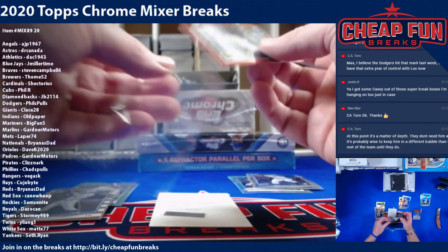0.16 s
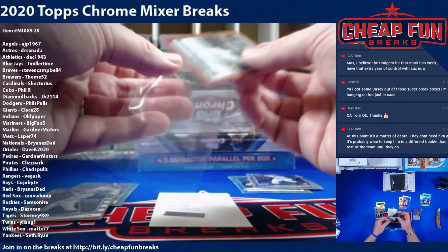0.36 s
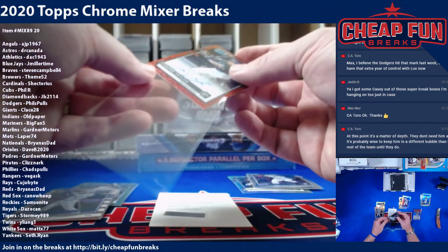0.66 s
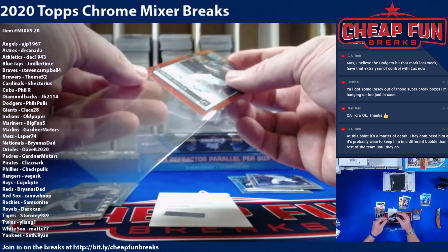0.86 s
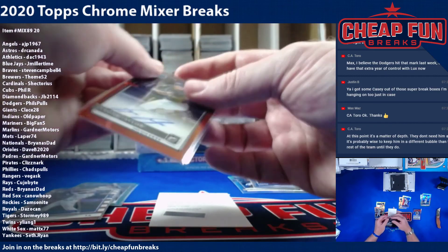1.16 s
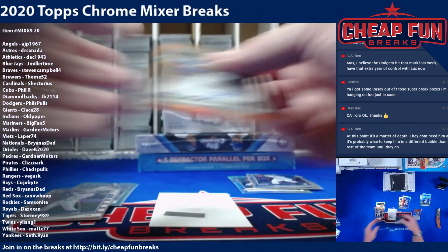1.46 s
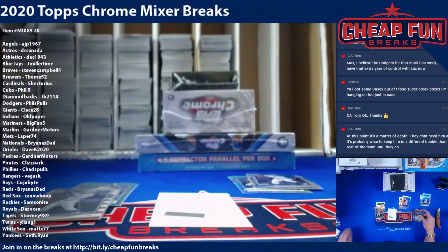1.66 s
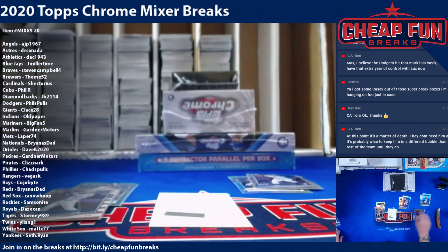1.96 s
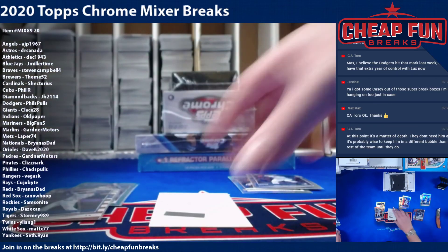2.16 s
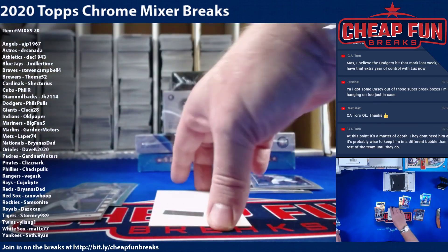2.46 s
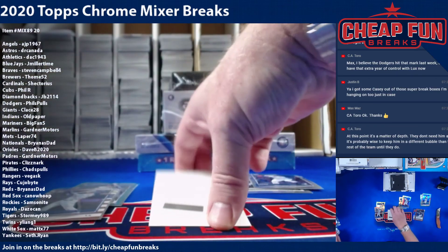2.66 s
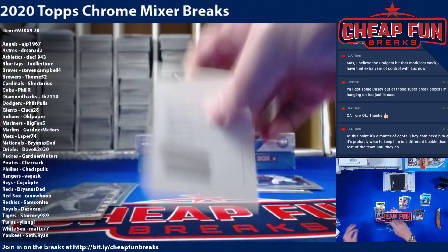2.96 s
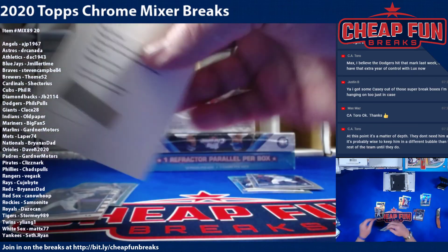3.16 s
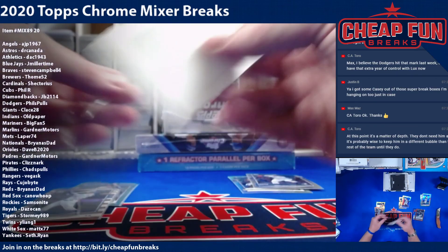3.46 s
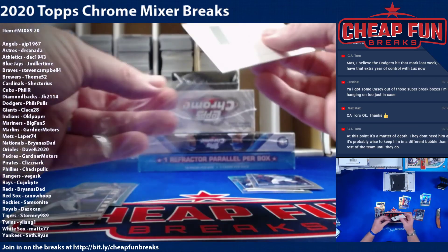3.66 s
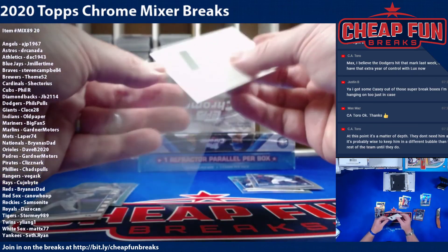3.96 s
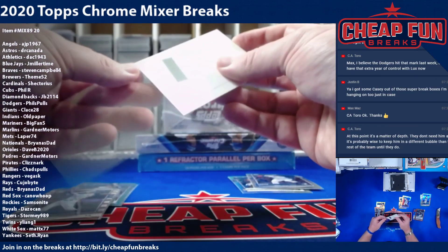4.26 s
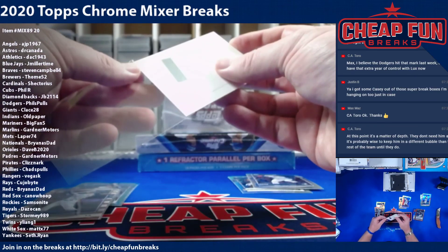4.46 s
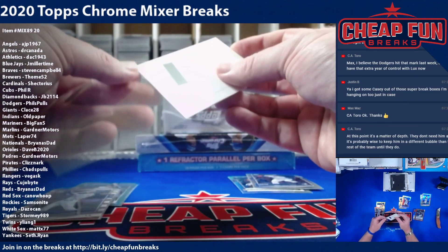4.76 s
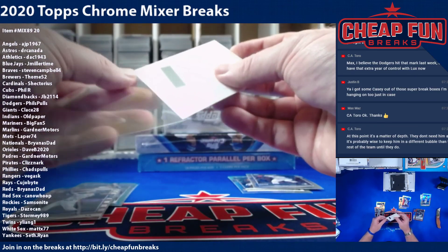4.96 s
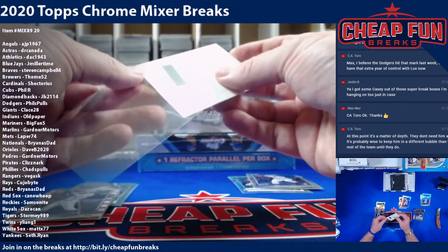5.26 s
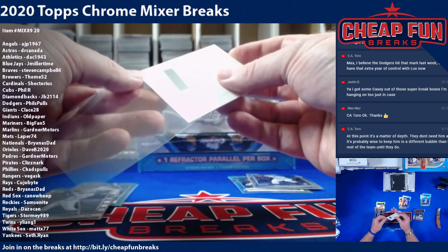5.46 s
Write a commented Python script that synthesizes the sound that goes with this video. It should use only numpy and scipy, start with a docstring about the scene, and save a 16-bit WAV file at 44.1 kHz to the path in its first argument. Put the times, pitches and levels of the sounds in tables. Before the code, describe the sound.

A card slides into a stiff plastic sleeve with faint rustles, sharp little clicks and soft table bumps over a low fan hum.

```python
"""A trading card slides into a stiff clear plastic sleeve and is laid on a padded table; a second card is
picked up and nudged against another sleeve, whose lip snaps once. Sliding is a hiss of tiny slips; edges
catch and crack; both ring the sleeve's flexing modes. Fingers and cards tap, a hand bumps the table.
All is close to the microphone, in a small room where fan motors hum."""
import sys
import numpy as np
from scipy import signal
from scipy.fft import rfft, irfft
from scipy.io import wavfile

SR = 44100
rng = np.random.default_rng(int(sys.argv[2]) if len(sys.argv) > 2 else 0)


def wav_out(sig):
    """Save sig, one row per channel (or a flat mono array), as 16-bit PCM at SR to the path in sys.argv[1]."""
    wavfile.write(sys.argv[1], SR, np.round(np.clip(np.atleast_2d(sig).T, -1, 1) * 32767).astype(np.int16))


N = 246871
TIME_S = np.arange(N) / SR

# Card pushed down the sleeve. Each row: time in seconds, relative hiss level in dB.
SLIDE_LEVELS = [(0.82, -87), (0.838, -77), (0.902, -68.5), (1.07, -65.5), (1.075, -57)]
# Sleeve flexing modes. Each row: multiple of the ring pitch, T60 in seconds, level in dB.
SLEEVE_MODES = [(1, .023, 2), (1.25, .012, -6), (1.68, .012, -14), (2.42, .01, -10)]
# Sleeve edge catching and letting go. Each row: release time in seconds, level in dB, hold in seconds,
# treble edge in Hz, ring pitch at release in Hz.
EDGE_SNAPS = [(1.0847, -49, .0016, 12900, 4550), (1.307, -60, 0.0007, 12000, 8100),
              (1.3332, -49, 0.0047, 14800, 9760), (1.7576, -70, 0.00027, 18000, 4740),
              (1.8133, -57.5, .003, 13900, 2290), (2.327, -65.5, 0.00097, 7400, 3680),
              (2.861, -67.5, 0.0017, 8500, 6350), (5.0814, -45.5, 0.00073, 9000, 2840)]
# Card, skin and plastic brushing. Each row: start in seconds, length in seconds, level in dB,
# hiss centre in Hz.
RUB_STROKES = [(0, 0.17, -73, 3800), (0.326, 0.14, -73.5, 6200), (0.483, 0.024, -65.5, 5170),
               (1.163, 0.031, -64, 4500), (1.255, 0.12, -63, 4270), (1.318, 0.065, -62, 9000),
               (1.382, 0.087, -62.5, 4100), (1.771, 0.059, -60, 4850), (2.303, 0.11, -73, 3500),
               (2.508, 0.12, -71.5, 3220), (2.631, 0.092, -72.5, 5470), (2.835, 0.039, -68.5, 3600),
               (2.904, 0.027, -63, 5200), (3.186, 0.023, -61, 4060), (3.195, .09, -65.5, 6000),
               (3.291, 0.18, -65, 4100), (3.351, 0.65, -76, 2950), (3.847, .044, -66, 7600),
               (3.999, 0.058, -67, 2960), (4.25, 0.046, -63, 2200), (4.53, .032, -69, 3900),
               (4.87, 0.12, -67, 5200)]
# Dragging edge; pitch is lower with the card inside. Each row: start in seconds, length in seconds,
# level in dB, pitch in Hz.
EDGE_SQUEAKS = [(1.3, .09, -70, 2400), (1.395, 0.067, -64, 2323), (2.905, 0.023, -67.5, 2770),
                (4.256, 0.04, -61, 2780), (4.538, .024, -71, 2810)]
# Fingers and cards touching down. Each row: start in seconds, level in dB, knock pitch in Hz.
TOUCHES = [(.583, -74, 1300), (1.712, -62.5, 700), (1.7575, -55, 774), (1.7584, -57.5, 1800),
           (1.828, -66, 2010), (2.327, -59.5, 1160), (2.453, -68, 1240), (2.531, -69, 2140),
           (2.579, -66, 1240), (2.8589, -58.5, 576), (3.197, -63, 1870)]
# Hand on the table. Each row: start in seconds, level in dB, pitch in Hz, swell time in seconds.
TABLE_BUMPS = [(2.259, -30, 37.6, 0.056), (2.325, -59, 240, 0.016), (3.26, -28.5, 36.1, 0.028),
               (3.272, -39, 104, 0.0082)]
# Motor and mains lines. Each row: frequency in Hz, level in dB.
HUM_LINES = [(29.48, -44.5), (45.8, -52), (58.29, -47), (96.77, -58), (120, -70.5), (137.4, -66.5)]
# Faint electrical whine. Each row: frequency in Hz, level in dB.
WHINE_LINES = [(2782, -97), (3000, -95.5), (4720, -98), (4910, -100), (7000, -96), (7504, -96.5),
               (8282, -103), (9170, -96.5)]
# Fan rumble and microphone hiss. Each row: frequency in Hz, density in dB per Hz.
NOISE_SPECTRUM = [(8, -58), (25, -64), (50, -67), (68, -68), (86, -67), (112, -80), (160, -81),
                  (290, -95.5), (400, -99), (470, -97.5), (570, -101), (1000, -107), (2000, -112),
                  (15000, -114.5)]


def card_slide(gain_db=1, stop_s=0.04):
    """The card hisses down the sleeve ever faster and comes to rest."""
    out = np.zeros(N)
    times_s, levels_db = np.transpose(SLIDE_LEVELS)
    t = times_s[0] + TIME_S[:SR]
    stopping = np.interp(t - times_s[-1], [0, stop_s], [1, 0])
    speed = undb(np.interp(t, times_s, levels_db) + gain_db) * stopping
    add(out, times_s[0], speed * friction(centre_hz=12000, ring_db=-21, body_db=-20))
    return out


def friction(centre_hz, ring_db, body_db, judder_db=2.5, spread_ratio=2.12):
    """Sliding surfaces hiss, judder and stir the sleeve's modes."""
    push = slips()
    hiss = unit(band(push, centre_hz / spread_ratio, centre_hz * spread_ratio))
    ring = undb(ring_db) * unit(sleeve_ring(push, pitch_hz=2800))
    body = undb(body_db) * unit(band(rng.standard_normal(SR), 370, 1900))
    judder = undb(judder_db * walk(TIME_S[:SR], rate_hz=120))
    return judder * (hiss + ring + body)


def slips(rate_hz=14000, grain_db=2.5):
    """One second of dense slips of uneven size."""
    caught = rng.random(SR) < rate_hz / SR
    return caught * rng.standard_normal(SR) * undb(grain_db * np.minimum(rng.exponential(size=SR), 4))


def sleeve_ring(push, pitch_hz):
    """The sleeve's modes answer a push; grip and bend shift them all together."""
    t = TIME_S[:SR // 10]
    ring = sum(undb(db) * mode(t, pitch_hz * ratio, t60_s) for ratio, t60_s, db in SLEEVE_MODES)
    return signal.fftconvolve(push, ring)[:len(push)]


def sleeve_snaps(catch_scrape_s=0.0034, release_scrape_s=0.00083, body_db=-11.5):
    """The plastic lip catches, lets go with a bright crack and rings on."""
    out, t = np.zeros(N), TIME_S[:SR // 10]
    for release_s, db, held_s, edge_hz, ring_hz in EDGE_SNAPS:
        ring_db = -6.5 - 6.5 * np.log2(edge_hz / 11500)  # duller cracks ring more
        # The catch is weaker, and the pressed sleeve rings lower.
        catch = (release_s - held_s, db - 2.5, catch_scrape_s, ring_hz * 0.76)
        release = (release_s, db, release_scrape_s, ring_hz)
        for start_s, click_db, scrape_s, pitch_hz in (catch, release):
            push = contact(t, scrape_s, scrape_db=18)
            crack = blow(band(push, 1700, edge_hz))
            body = undb(body_db) * blow(band(contact(t, scrape_s, scrape_db=24), 220, 1450))
            ring = undb(ring_db) * blow(sleeve_ring(push, pitch_hz))
            add(out, start_s, undb(click_db) * (crack + body + ring))
    return out


def contact(t, scrape_s, scrape_db):
    """One sharp impulse, then a dying scrape of tiny slips."""
    scrape = rng.standard_normal(len(t)) * np.exp(-t / scrape_s)
    return blow(signal.unit_impulse(len(t))) + undb(scrape_db) * blow(scrape)


def rubs():
    """Each stroke hisses as loudly as it moves fast."""
    out = np.zeros(N)
    for start_s, length_s, db, centre_hz in RUB_STROKES:
        hiss = friction(centre_hz, ring_db=-17, body_db=-16)
        add(out, start_s, undb(db) * stroke_speed(length_s) * hiss)
    return out


def stroke_speed(length_s, rise_share=0.33):
    """A movement gathers pace from 0 to 1, then stops."""
    return np.sin(np.pi / 2 * np.interp(TIME_S[:SR] / length_s, [0, rise_share, 1], [0, 1, 0]))


def squeaks():
    """The slips of a dragging edge go straight into the sleeve's modes."""
    out = np.zeros(N)
    for start_s, length_s, db, pitch_hz in EDGE_SQUEAKS:
        add(out, start_s, undb(db) * stroke_speed(length_s) * unit(sleeve_ring(slips(), pitch_hz)))
    return out


def taps(tick_db=-2, t60_halving_db=7):
    """A dull knock, pitched by what is touched, with the card edge's tick and the padding's thud."""
    out, t = np.zeros(N), TIME_S[:SR // 10]
    for start_s, db, knock_hz in TOUCHES:
        t60_s = 0.011 * 2 ** ((-61 - db) / t60_halving_db)  # a firmer touch damps its own knock
        knock = blow(mode(t, knock_hz, t60_s))
        tick = blow(band(contact(t, scrape_s=0.002, scrape_db=1), 870, 4000, order=1))
        thud = blow(mode(t, hz=245, t60_s=0.0033))
        add(out, start_s, undb(db) * (knock + undb(tick_db) * tick + thud))
    return out


def table_bumps():
    """The table sways under the soft weight of the hand and shakes the microphone."""
    out, t = np.zeros(N), TIME_S[:SR // 2]
    for start_s, db, hz, swell_s in TABLE_BUMPS:
        sway = (t / swell_s) ** 2 * np.exp(2 - 2 * t / swell_s)
        add(out, start_s, undb(db) * sway * np.sin(2 * np.pi * hz * t))
    return out


def room(x, echo_s=0.00976, echo_db=-14.5, tail_t60_s=0.19, tail_db=-12.5):
    """Reflections only: one near surface echoes; the furnished room adds a short tail."""
    t = TIME_S[:SR // 2]
    tail_envelope = (1 - np.exp(-t / 0.0016)) * np.exp(-np.log(1000) * t / tail_t60_s)
    echo_envelope = np.exp(-((t - echo_s) / 0.0014) ** 2)
    tail = band(rng.standard_normal(len(t)), 150, 10000, order=1) * tail_envelope
    echo = band(rng.standard_normal(len(t)), 370, 10000, order=1) * echo_envelope
    response = undb(tail_db) * tail / np.linalg.norm(tail) + undb(echo_db) * echo / np.linalg.norm(echo)
    return signal.fftconvolve(x, response)[:N]


def fans(waver_db=2.15, drift_rad=0.09):
    """Wavering motor lines over air rumble, hiss and a thin whine."""
    knots_hz, density_db = np.transpose(NOISE_SPECTRUM)
    bins_hz = np.fft.rfftfreq(N, 1 / SR)
    colour_db = np.interp(np.log(bins_hz + 1e-9), np.log(knots_hz), density_db)
    colour = undb(colour_db) * (bins_hz > knots_hz[0])
    out = irfft(rfft(rng.standard_normal(N)) * colour, N) * np.sqrt(SR / 2)
    for hz, db in HUM_LINES + WHINE_LINES:
        phase_rad = 2 * np.pi * (hz * TIME_S + rng.random()) + drift_rad * walk(TIME_S, rate_hz=2.4)
        out += np.sqrt(2) * undb(db + waver_db * walk(TIME_S, rate_hz=2.85)) * np.sin(phase_rad)
    return out


def mode(t, hz, t60_s):
    """A struck resonance."""
    return np.sin(2 * np.pi * hz * t) * np.exp(-np.log(1000) * t / t60_s)


def walk(t, rate_hz):
    """Random values joined by straight lines."""
    knots = rng.standard_normal(int(t[-1] * rate_hz) + 2)
    return np.interp(t * rate_hz, np.arange(len(knots)), knots)


def band(x, low_hz, high_hz, order=2):
    """Band-pass, edges held below Nyquist."""
    high_hz = min(high_hz, SR * 0.45)
    low_hz = min(low_hz, high_hz - 100)
    return signal.sosfilt(signal.butter(order, [low_hz, high_hz], "band", fs=SR, output="sos"), x)


def undb(db):
    """Decibels to gain."""
    return 10 ** (np.asarray(db) / 20)


def unit(x):
    """Scale to rms 1."""
    return x / np.sqrt(np.mean(x ** 2))


def blow(x):
    """Scale to the energy of 10 ms at rms 1."""
    return x / np.sqrt(np.sum(x ** 2) / (SR / 100))


def add(track, start_s, x):
    """Mix x into the track."""
    i = max(int(start_s * SR), 0)
    track[i:i + len(x)] += x[:max(N - i, 0)]


def scene():
    """Card handling in the room, over the steady hum; mono."""
    sliding = rubs() + card_slide() + squeaks()
    reflections = room(sliding)
    # A click radiates a different fine colour in each direction, so its reflections blend smoothly.
    for _ in range(2):
        reflections += room(sleeve_snaps() + taps()) / np.sqrt(2)
    return (sleeve_snaps() + taps() + sliding + reflections + table_bumps() + fans())[None]


def record(dry, cutoff_hz=15900):
    """Steep low-pass on the top treble."""
    return signal.sosfilt(signal.ellip(10, 0.1, 70, cutoff_hz, fs=SR, output="sos"), dry)


dry = scene()
out = record(dry)
wav_out(out)
```